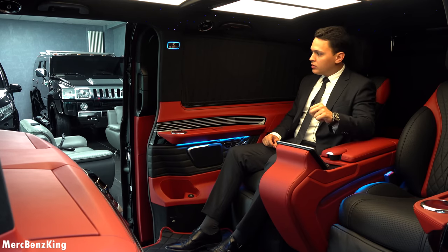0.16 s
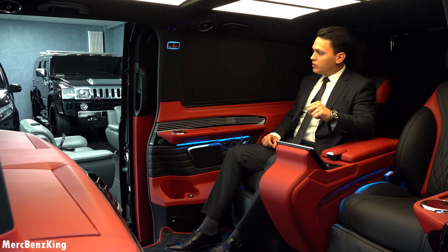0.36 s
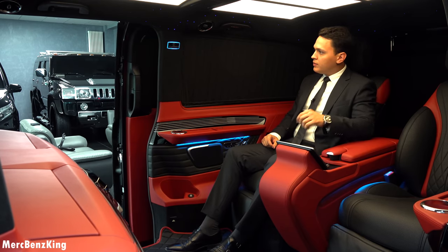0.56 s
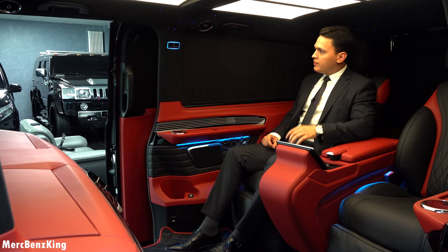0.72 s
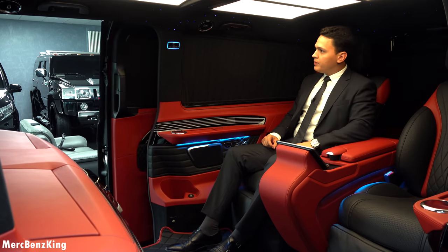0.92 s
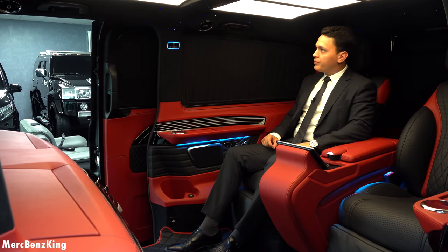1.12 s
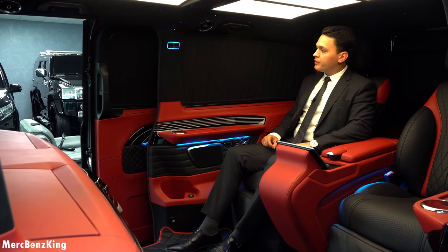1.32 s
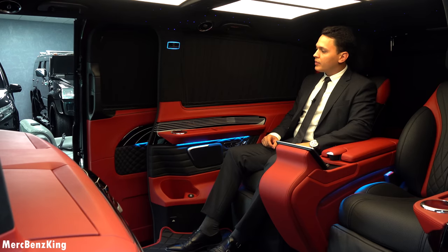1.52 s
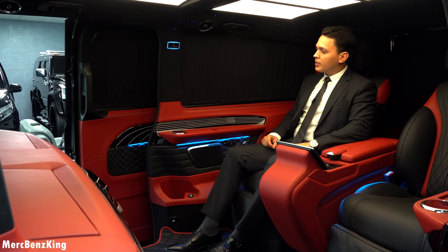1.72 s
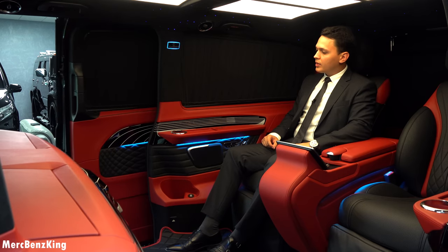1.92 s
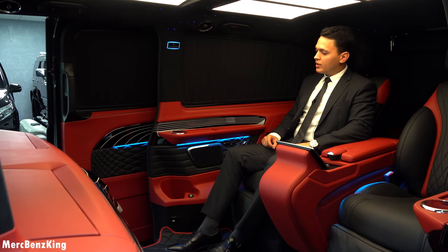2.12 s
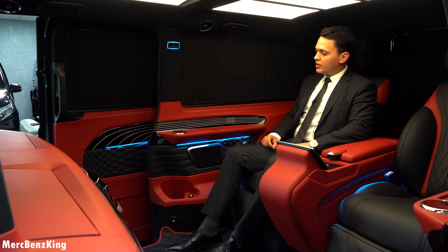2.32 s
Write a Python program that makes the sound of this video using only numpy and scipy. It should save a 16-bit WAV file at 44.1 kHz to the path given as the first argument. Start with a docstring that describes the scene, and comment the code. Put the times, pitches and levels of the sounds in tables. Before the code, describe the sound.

Motorised van door sliding shut: steady muffled roller rumble, early latch knocks, then a sharper double clack

```python
"""Inside a padded van cabin a powered sliding door starts to close. From the first moment rollers rumble along
the track as dense bumps in filtered noise, over microphone hiss and a faint drive-motor whine of wavering sines.
In the first half second catches and linkage knock and rattle as noise bursts through ringing door modes, with
short hard taps and soft jolts that swing the body modes. At 0.8 s something brushes by as band-passed noise.
A second cluster of knocks, taps and jolts peaks near 1.3 s; then a motor hum joins as the rumble rolls on."""
import sys
import numpy as np
from scipy import signal
from scipy.fft import rfft, irfft
from scipy.io import wavfile
from scipy.ndimage import uniform_filter1d

SR = 44100
rng = np.random.default_rng(int(sys.argv[2]) if len(sys.argv) > 2 else 0)


def put_to_file(sound):
    """Save the sound as 16-bit audio at rate SR, in the file named by the first command-line argument."""
    columns = np.atleast_2d(sound).T  # one column per channel
    safe = np.clip(columns, -1, 1)
    whole_steps = np.round(safe * 32767)
    wavfile.write(sys.argv[1], SR, whole_steps.astype(np.int16))


def volts_from_db(level):
    """Convert decibel levels to linear amplitude ratios."""
    exponent = np.asarray(level, float) / 20
    return 10 ** exponent


N = 104208  # length in samples

# Microphone hiss spectrum. Each row: frequency in Hz, relative density in dB per Hz.
HISS_SPECTRUM = [(880, -34), (1500, -17), (2070, -7.5), (2310, 1), (2500, -6.5), (2980, 0), (3160, -4),
                 (4540, -4), (5470, -2.5), (6780, 2.5), (8840, 1), (10400, -7.5), (15600, -7)]
HISS_DB = -69  # rms

# Drive-motor tones, the hum first, then the whine. Each row: frequency in Hz, level in dB rms, both wavering.
MOTOR_TONES = [(590, -61.5), (1195, -84.5), (2363, -91), (2945, -90)]
HUM_START_S = 1.35

# Soft brush: one swell of hiss.
BRUSH_START_S, BRUSH_RISE_S, BRUSH_HOLD_S, BRUSH_FALL_S = 0.835, 0.082, 0.057, 0.13
BRUSH_DB, BRUSH_FIRST_HZ, BRUSH_LAST_HZ = -61.5, 7300, 6450

# Resonances of the van body. Each row: frequency in Hz, level in dB, 60 dB decay time in seconds.
BODY_MODES = [(33, 3, .3), (58, 0, .2), (82, -1, .15), (130, -1, .1), (190, -7, .08)]

# Soft jolts. Each row: start in seconds, level in dB, push length in seconds, direction (1 or -1),
# peak of the after-swing in dB relative to the push.
JOLT_EVENTS = [(.008, -29, 0.0097, 1, -14), (0.087, -30.5, 0.0017, 1, -8), (0.127, -24, 0.006, -1, -33),
               (.132, -24, .007, 1, -25), (.356, -25, 0.013, 1, -1), (.389, -23.5, 0.0068, -1, -25),
               (0.394, -20, 0.0075, 1, -20), (0.4081, -9.5, 0.0061, 1, -14), (.421, -20.5, .02, 1, -27),
               (0.447, -23, 0.0115, -1, -25), (0.459, -22, 0.018, 1, -15), (.523, -21.5, 0.0071, 1, -17.5),
               (1.257, -28, .008, 1, -18), (1.263, -26, .008, -1, -20), (1.27, -21, 0.0053, 1, -14),
               (1.277, -25.5, .005, 1, -9), (1.741, -35, 0.026, -1, -6)]

# Resonances of the door panels. Each row: frequency in Hz, level in dB, 60 dB decay time in seconds.
DOOR_MODES = [(339, 4.5, 0.063), (414, -2, .05), (494, 0.5, 0.057), (559, -4, .04), (658, -5.5, 0.043),
              (725, -2.5, 0.039), (816, 0, 0.042), (886, -4, 0.04), (1002, -6.5, 0.041), (1184, -7, .04),
              (1300, -6, .04), (1385, -5, .028), (1440, -5, .035), (1600, -8, .035), (1790, -8, .035),
              (2096, -15, .03), (2340, -10.5, .03), (2440, -10, 0.034), (2873, -10, .03), (3200, -14, .02)]

# Single hard taps. Each row: start in seconds, level in dB, contact time in seconds, direction (1 or -1).
TAP_EVENTS = [(.2068, -31, .0016, 1), (.2107, -33, .0016, 1), (.2165, -32, .0013, 1),
              (.2203, -33, .0012, -1), (.2285, -31.5, .0014, -1), (.2375, -33, .0013, 1),
              (.342, -36, .0008, 1), (.3555, -27, .002, -1), (.364, -27, .0018, -1),
              (.4415, -27, .0016, -1), (.522, -34, .001, -1), (.7915, -50, .0003, 1),
              (1.1785, -40, .0009, 1), (1.2925, -22, .0005, -1), (1.2972, -18, .0005, 1),
              (1.3085, -22, .0014, 1), (1.3115, -24, .0014, 1)]
TAP_RING_DB = -8  # peak of the ringing relative to the push

# Knocks and rattles. Each row: start in seconds, level in dB, rise in seconds, fade in seconds,
# low edge of the contact band in Hz, high edge in Hz.
KNOCK_EVENTS = [(.03, -51, 0.0015, 0.018, 1800, 3500), (0.046, -51.5, 0.0043, 0.031, 4830, 6500),
                (.045, -46.5, 0.0048, 0.028, 700, 3160), (.113, -56, 0.00083, 0.0044, 710, 4000),
                (0.121, -64.5, 0.022, 0.086, 4900, 7100), (.128, -51.5, 0.0033, 0.038, 330, 1620),
                (.204, -41, 0.004, 0.024, 420, 620), (.222, -42, 0.006, 0.013, 650, 850),
                (.212, -58, .003, .01, 1150, 1310), (.225, -48.5, 0.0064, 0.019, 1250, 1350),
                (.2615, -53, 0.0004, 0.0008, 1500, 3500), (1.179, -44, .008, .016, 1340, 1520),
                (.031, -41, .002, .007, 1320, 1500), (.339, -40, .001, 0.007, 600, 930),
                (.340, -53, 0.0013, 0.013, 1210, 1630), (.347, -36, 0.0068, .02, 246, 510),
                (0.357, -61.5, 0.002, 0.075, 1600, 8000), (.408, -35.5, 0.011, 0.0086, 540, 880),
                (.43, -39, .003, .007, 610, 890), (.405, -48, 0.0051, 0.021, 1120, 1260),
                (.418, -43.5, .004, 0.0092, 830, 990), (0.407, -54, 0.0018, 0.03, 2040, 5600),
                (.436, -35, 0.005, 0.007, 380, 615), (0.44, -44, 0.0035, 0.0093, 526, 640),
                (.461, -61, 0.00067, 0.0038, 1530, 3400), (.478, -59, 0.0016, 0.05, 1000, 7400),
                (.521, -46.5, 0.00088, 0.01, 415, 1230), (0.52, -59.5, .001, 0.016, 2000, 3600),
                (.791, -61.5, 0.00027, 0.0022, 1220, 4930), (.823, -51.5, 0.0013, 0.0051, 1150, 1360),
                (0.78, -60, 0.0042, 0.012, 380, 1250), (1.176, -43, 0.01, 0.027, 300, 700),
                (1.177, -53, 0.004, 0.048, 1250, 1900), (1.18, -61, 0.0017, 0.16, 2700, 8200),
                (1.25, -42.5, 0.025, 0.022, 460, 1940), (1.286, -30, 0.006, 0.009, 710, 1100),
                (1.285, -27, 0.0042, 0.0045, 1280, 1530), (1.287, -34.5, 0.0042, 0.0095, 1550, 3220),
                (1.287, -31.5, 0.0056, 0.009, 2500, 3160), (1.292, -30, 0.01, 0.008, 295, 414),
                (1.29, -34, .006, 0.011, 428, 560), (1.282, -43, 0.012, 0.014, 3800, 6900),
                (1.303, -32.5, 0.004, 0.01, 600, 1900), (1.326, -55, 0.029, 0.015, 2280, 3400),
                (1.33, -63, 0.027, 0.072, 3700, 7200), (1.36, -59, 0.02, 0.06, 2900, 3450),
                (1.334, -50.5, 0.0094, 0.042, 720, 1440), (1.35, -55, .03, 0.054, 1200, 1830),
                (2.318, -60.5, .0005, 0.0018, 1500, 6000)]
BARE_RATTLE_DB = -1.5
CABIN_T60_S, CABIN_DB = 0.37, -13.5  # diffuse tail behind every knock

# Rollers on the track. Each row: time in seconds, level of the bass above the deepest part in dB,
# panel noise in dB relative to it, deepest bass in dB relative to it.
ROLL_LEVELS = [(0, -42.5, -9, 3), (0.099, -38.5, -5, -6), (.22, -38, -4, -15), (.29, -43, -11, -2.5),
               (0.336, -50, -7, 0), (0.351, -27, -6, -14), (.46, -36, -7, -5), (.6, -37.5, -10, 0),
               (.72, -40, -10, 0), (0.822, -36.5, -14.5, -12), (1.0, -40.5, -8.5, 2.5),
               (1.07, -43.5, -5, -6), (1.16, -39, -8, -14), (1.19, -36, -5, -15), (1.36, -35, -10.5, -14),
               (1.5, -38, -9.5, -9), (1.62, -38.5, -13.5, -6), (1.72, -32, -14.5, -0.5),
               (1.82, -38.5, -10.5, -7), (1.95, -39.5, -9, -14), (2.05, -32, -21.5, -20),
               (2.14, -35.5, -14.5, -15), (2.22, -44, -2.5, -3), (2.36, -33.5, -19, -28)]
DEEP_HZ = 60.8  # where the deepest bass ends

# Body rumble spectrum. Each row: frequency in Hz, relative density in dB per Hz.
RUMBLE_SPECTRUM = [(13, -5), (22, -2), (70, 3.5), (135, -2.5), (153, 0.5), (171, -10.5), (204, -5),
                   (253, -19.5), (271, -51), (320, -35), (420, -53.5), (700, -120)]

# Panel noise spectrum. Each row: frequency in Hz, relative density in dB per Hz.
PANEL_SPECTRUM = [(150, -26.5), (250, -1.5), (269, -3.5), (335, 6), (366, -0.5), (508, -3.5), (550, -8.5),
                  (580, -3.5), (625, -9.5), (700, -10), (760, -15), (812, -11.5), (860, -18.5), (1200, -37),
                  (2200, -69), (2860, -49), (4840, -120)]

# Level of the rollers' mid-range grind. Each row: time in seconds, level in dB rms.
GRIND_LEVELS = [(0, -64.5), (.15, -54.5), (.3, -65.5), (.5, -61), (.7, -66), (.85, -66.5), (1.0, -66.5),
                (1.16, -74.5), (1.2, -57), (1.4, -54), (1.5, -57.5), (1.6, -63), (1.73, -62), (1.85, -68),
                (2.0, -72.5), (2.36, -72.5)]

BUMPS_PER_S, BUMP_SPREAD_DB = 600, 1.5
BODY_SWING_DB = 4  # body-mode share relative to the direct rumble


def unit(x):
    """Scale to rms 1."""
    return x / np.sqrt(np.mean(x ** 2))


def colour(x, spectrum):
    """Filter by a (Hz, dB) spectrum, then scale to rms 1."""
    hz, db = np.array(spectrum, float).T
    f = np.maximum(np.fft.rfftfreq(len(x), 1 / SR), 1)
    gain = volts_from_db(np.interp(np.log(f), np.log(hz), db, left=-90, right=-90))
    return unit(irfft(rfft(x) * gain, len(x)))


def band(x, low_hz, high_hz):
    """Gentle band-pass, kept at least a tenth of its low edge wide."""
    edges = [low_hz, max(high_hz, 1.1 * low_hz)]
    return signal.sosfilt(signal.butter(2, edges, "bandpass", fs=SR, output="sos"), x)


def ring(modes, length_s, weights):
    """Impulse response of a set of decaying modes."""
    t = np.arange(int(length_s * SR)) / SR
    return sum(w * volts_from_db(db) * np.sin(2 * np.pi * hz * t) * np.exp(-np.log(1000) * t / t60)
               for (hz, db, t60), w in zip(modes, weights))


def add(out, x, start_s):
    """Mix a sound in at its start time."""
    i = int(start_s * SR)
    out[i:i + len(x)] += x[:N - i]


def walk(rate):
    """Slow random wander of rms 1, from random steps drawn at a rate in Hz and smoothed twice."""
    k = int(SR / rate)
    steps = np.repeat(rng.standard_normal(N // k + 1), k)
    return unit(uniform_filter1d(uniform_filter1d(steps, k), k)[:N])


def microphone_hiss():
    """Steady random noise with the microphone's own colour."""
    return volts_from_db(HISS_DB) * colour(rng.standard_normal(N), HISS_SPECTRUM)


def motor(t):
    """Sines share one wavering speed: a faint whine throughout, and a hum that joins later."""
    turn = np.cumsum(1 + 0.00682 * walk(2.1)) / SR
    hum, *whine = (volts_from_db(db + 2.5 * walk(6)) * np.sqrt(2) * np.sin(2 * np.pi * hz * turn)
                   for hz, db in MOTOR_TONES)
    fade_in = np.clip((t - HUM_START_S) / 0.065, 0, 1)
    return hum * fade_in + sum(whine)


def brush(t):
    """A short soft hiss that crossfades between two noise bands, so its centre sinks."""
    full = BRUSH_START_S + BRUSH_RISE_S
    fall = full + BRUSH_HOLD_S
    end = fall + BRUSH_FALL_S
    envelope = np.interp(t, [BRUSH_START_S, full, fall, end], [0, 1, 1, 0]) ** 0.43
    mix = np.interp(t, [BRUSH_START_S, end], [0, 1])
    first, last = (unit(band(rng.standard_normal(N), hz / 1.36, hz * 1.28))
                   for hz in (BRUSH_FIRST_HZ, BRUSH_LAST_HZ))
    hiss = np.sqrt(1 - mix) * first + np.sqrt(mix) * last
    return volts_from_db(BRUSH_DB + walk(31.5)) * envelope * hiss


def jolts():
    """A soft push moves the cabin air and sets the body modes swinging."""
    out = np.zeros(N)
    body = ring(BODY_MODES, 0.5, [1 / hz for hz, _, _ in BODY_MODES])
    for start_s, db, push_s, direction, swing_db in JOLT_EVENTS:
        push = np.hanning(int(push_s * SR) + 2)
        swing = np.gradient(signal.fftconvolve(push, body))
        x = volts_from_db(swing_db) * swing / np.abs(swing[len(push):]).max()
        x[:len(push)] += (1 - x[len(push) // 2]) * push  # the sum reaches 1 mid-push
        add(out, np.sign(direction) * volts_from_db(db) * x, start_s)
    return out


def taps():
    """A short push heard bare, while it sets the door modes ringing."""
    out = np.zeros(N)
    for start_s, db, contact_s, direction in TAP_EVENTS:
        push = np.hanning(int(contact_s * SR) + 3)
        weights = volts_from_db(3.8 * rng.standard_normal(len(DOOR_MODES)))
        rung = signal.fftconvolve(np.gradient(push), ring(DOOR_MODES, 0.15, weights))
        x = -volts_from_db(TAP_RING_DB) * rung / np.abs(rung).max()
        x[:len(push)] += push
        add(out, np.sign(direction) * volts_from_db(db) * x, start_s)
    return out


def knocks():
    """Each knock is a swelling, fading rattle of contacts, heard bare and through the door modes."""
    out = np.zeros(N)
    t = np.arange(SR // 2) / SR
    signs = (-1.) ** np.arange(len(DOOR_MODES))
    for start_s, db, rise_s, fade_s, low_hz, high_hz in KNOCK_EVENTS:
        noise, roughness = rng.standard_normal((2, len(t)))
        envelope = np.minimum(t / rise_s, 1) * np.exp(-np.maximum(t - rise_s, 0) / fade_s)
        # the cabin answers brief knocks more weakly
        tail = volts_from_db(CABIN_DB) * np.sqrt(min(fade_s / 0.014, 1)) * volts_from_db(-60 * t / CABIN_T60_S)
        tail = tail * np.minimum(t / (rise_s + fade_s), 1)
        contacts = noise * ((0.5 + np.abs(roughness)) * envelope + tail)
        rattle = band(band(contacts, low_hz, high_hz), low_hz / 2, high_hz * 1.4)
        # every contact point weighs the modes a little differently
        weights = signs * volts_from_db(rng.standard_normal(len(DOOR_MODES)))
        rung = signal.fftconvolve(rattle, ring(DOOR_MODES, 0.15, weights))[:len(t)]
        share = np.clip(1.3 - low_hz / 2000, 0, 1)  # high contacts hardly ring the panels
        x = share * rung / np.linalg.norm(rung)
        x = x + volts_from_db(BARE_RATTLE_DB) * rattle / np.linalg.norm(rattle)
        energy_gain = np.sqrt(np.sum(envelope ** 2))  # longer knocks carry more energy
        add(out, volts_from_db(db) * energy_gain * x, start_s)
    return out


def roller_grind(t):
    """Mid-range noise of the rollers, heard bare and through the door modes."""
    noise = band(band(rng.standard_normal(N), 590, 1207), 740, 1600)
    modes = ring(DOOR_MODES, 0.15, (-1.) ** np.arange(len(DOOR_MODES)))
    rung = signal.fftconvolve(noise, modes)[:N]
    level_db = np.interp(t, *np.array(GRIND_LEVELS).T)
    return unit(unit(noise) + volts_from_db(-4.5) * unit(rung)) * volts_from_db(level_db)


def rollers(t):
    """Dense small bumps shake the body, noise swings its modes, and both excite the panels."""
    time_s, db, panel_db, deep_db = np.array(ROLL_LEVELS).T

    def level(relative_db):
        return volts_from_db(np.interp(t, time_s, db + relative_db))

    chance, side, size = rng.random((3, N))
    bumps = (chance < BUMPS_PER_S / SR) * np.sign(side - 0.5) * volts_from_db(-BUMP_SPREAD_DB * np.log(size + 1e-9))
    body = ring(BODY_MODES, 0.5, np.ones(len(BODY_MODES)))
    swing = signal.fftconvolve(rng.standard_normal(N), body)[:N]
    low = colour(bumps, RUMBLE_SPECTRUM) + volts_from_db(BODY_SWING_DB) * unit(swing)
    deep = signal.sosfiltfilt(signal.butter(3, DEEP_HZ, fs=SR, output="sos"), low)
    rumble = unit(low - deep) * level(0) + unit(deep) * level(deep_db)
    panel = colour(unit(bumps) * 0.99 + rng.standard_normal(N), PANEL_SPECTRUM)
    panel = panel * level(panel_db) * volts_from_db(1.4 * walk(24.61))  # the panel noise flutters
    return rumble + panel + roller_grind(t)


def scene():
    """Mix the door, its motor, the brush and the hiss to one channel."""
    t = np.arange(N) / SR
    background = microphone_hiss() + motor(t) + brush(t)
    door = jolts() + taps() + knocks() + rollers(t)
    return (background + door)[None]


def roll_off(x):
    """The treble ends steeply here."""
    return signal.sosfilt(signal.butter(12, 16210, fs=SR, output="sos"), x)


def record(dry):
    """The microphone drops the deepest bass, below 20 Hz."""
    mix = signal.sosfilt(signal.butter(2, 20, "highpass", fs=SR, output="sos"), dry)
    return roll_off(mix)


dry = scene()
out = record(dry)
put_to_file(out)
```